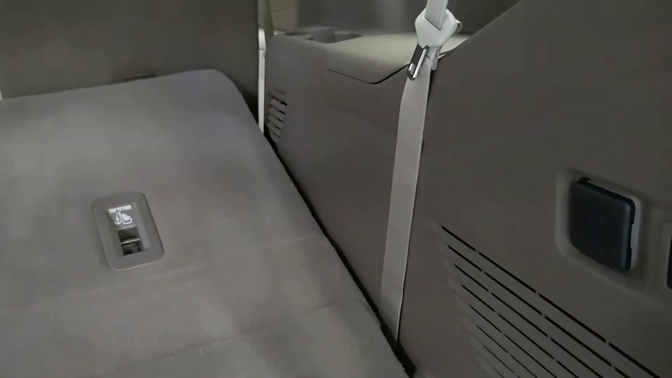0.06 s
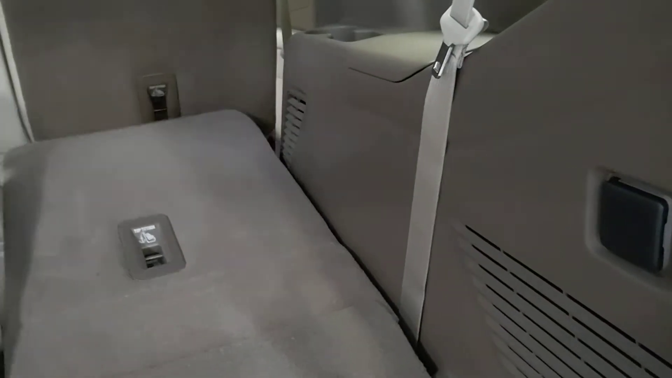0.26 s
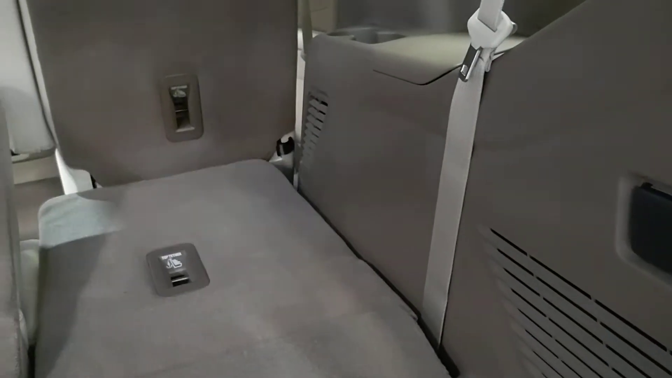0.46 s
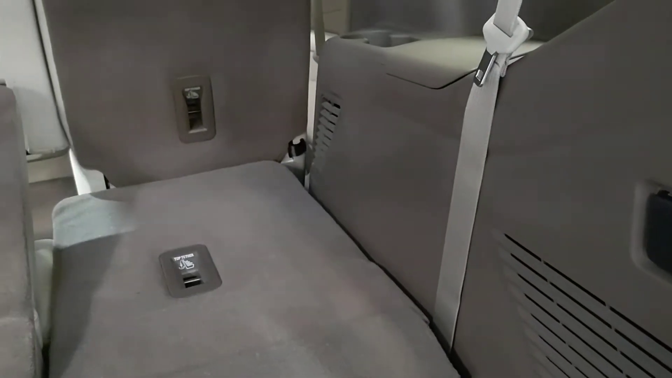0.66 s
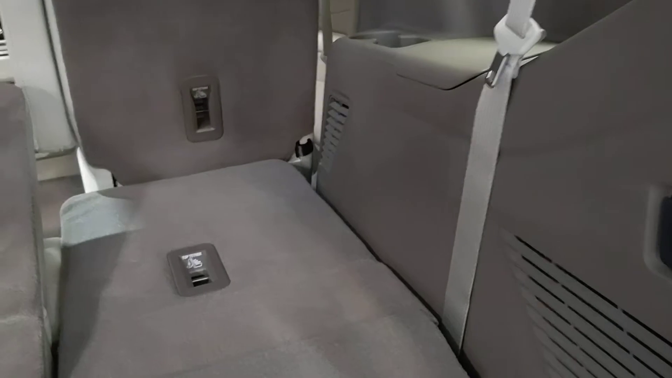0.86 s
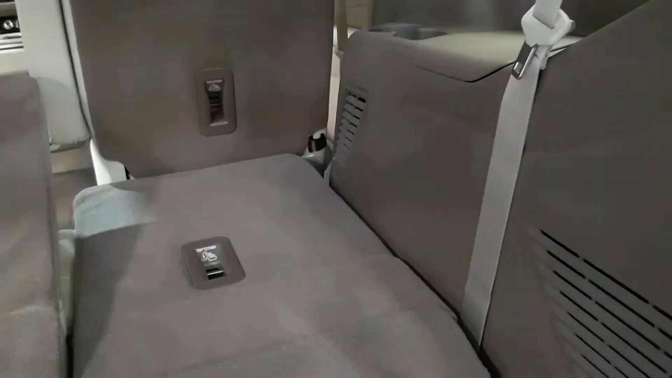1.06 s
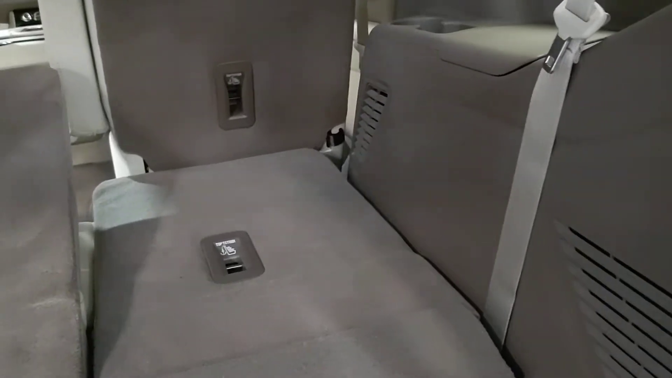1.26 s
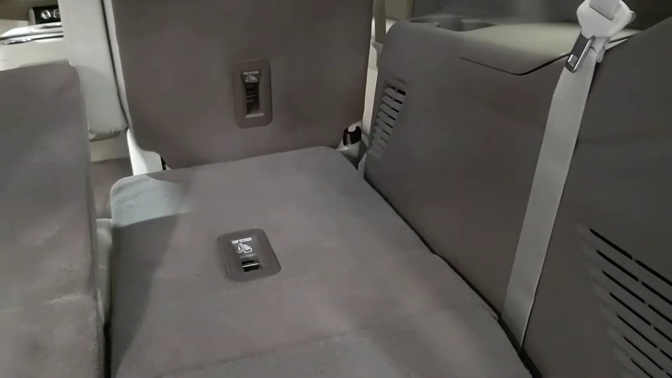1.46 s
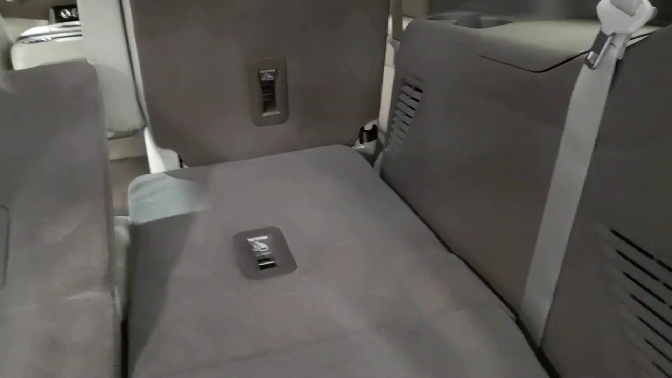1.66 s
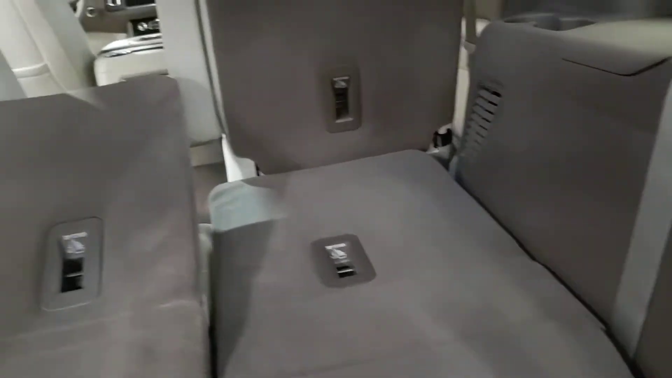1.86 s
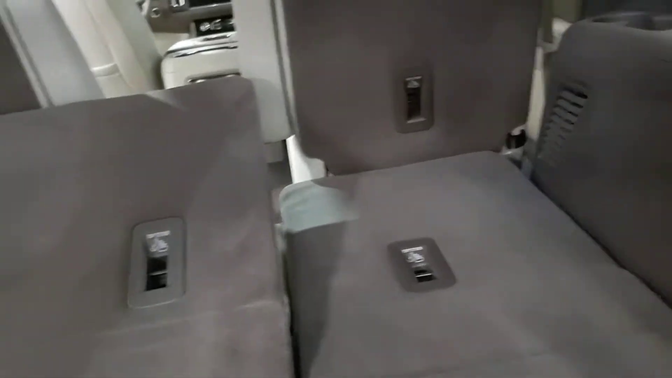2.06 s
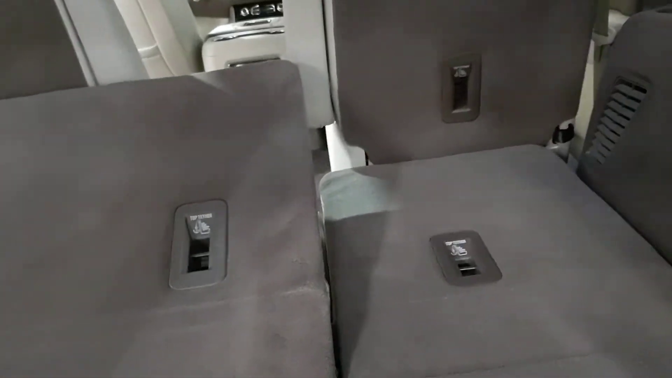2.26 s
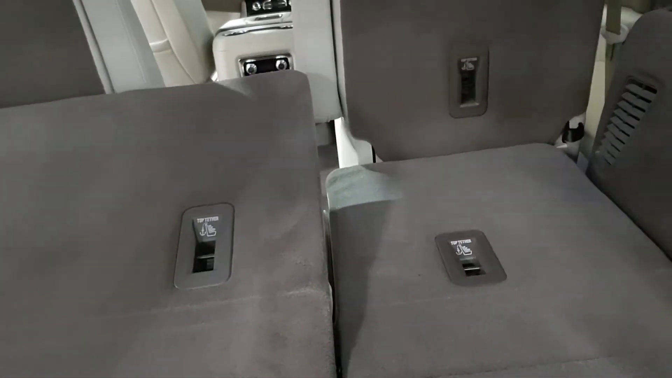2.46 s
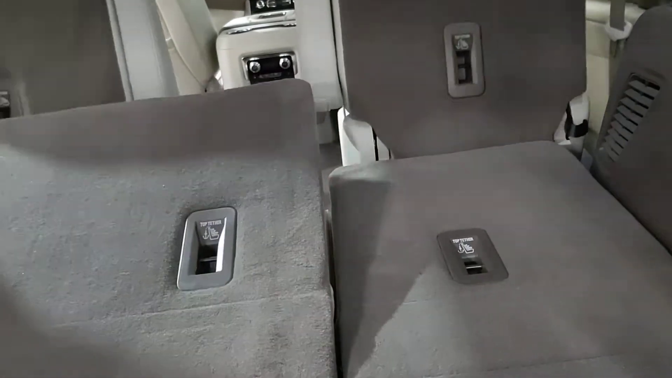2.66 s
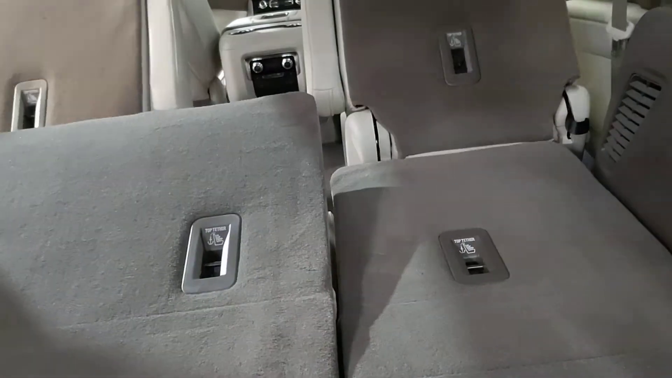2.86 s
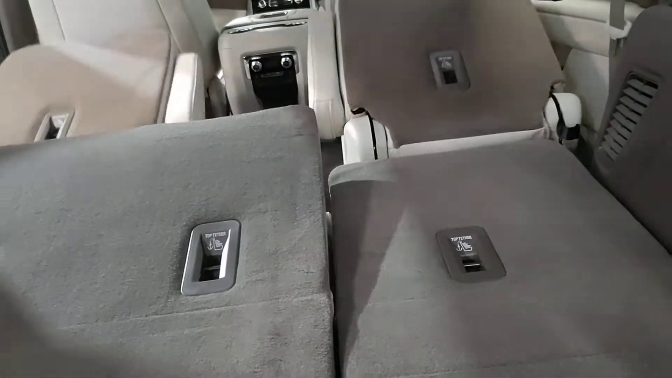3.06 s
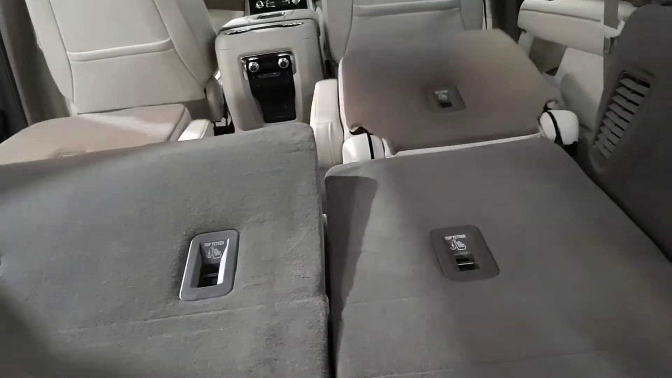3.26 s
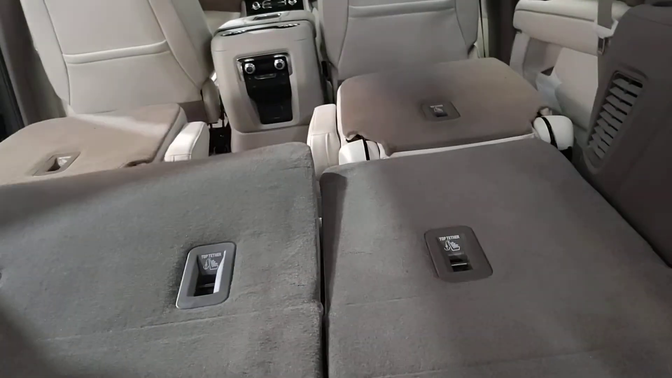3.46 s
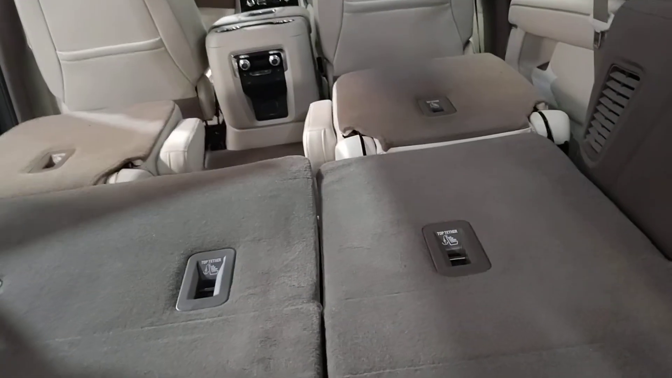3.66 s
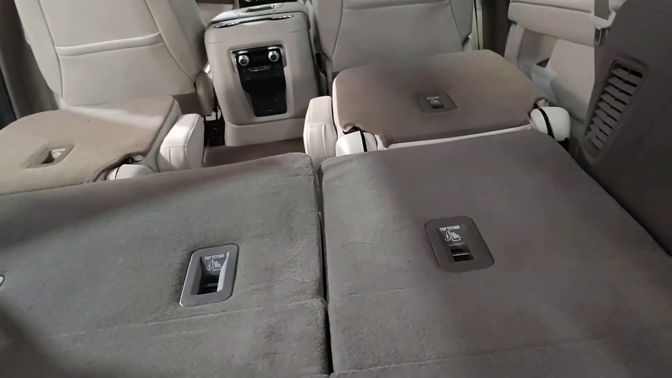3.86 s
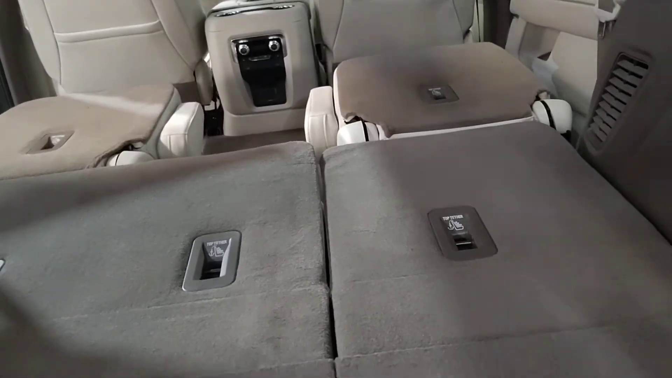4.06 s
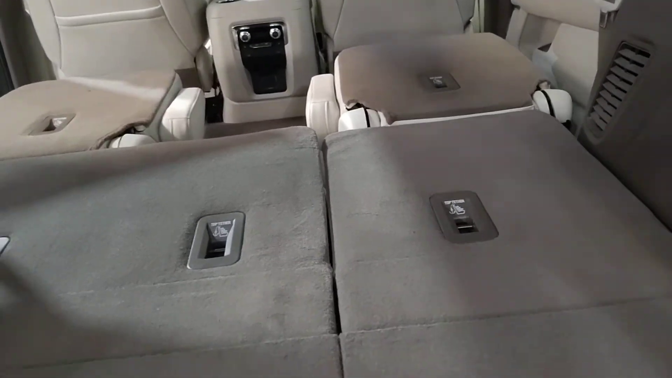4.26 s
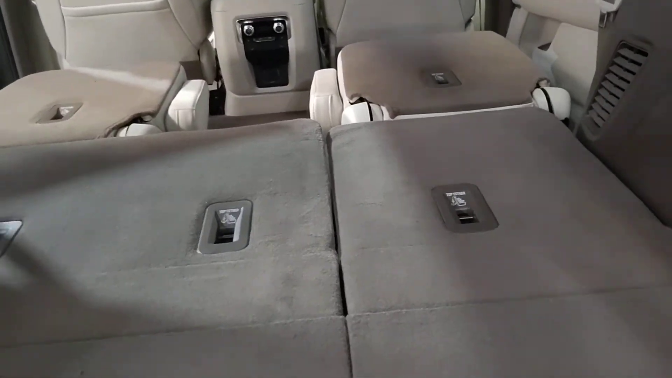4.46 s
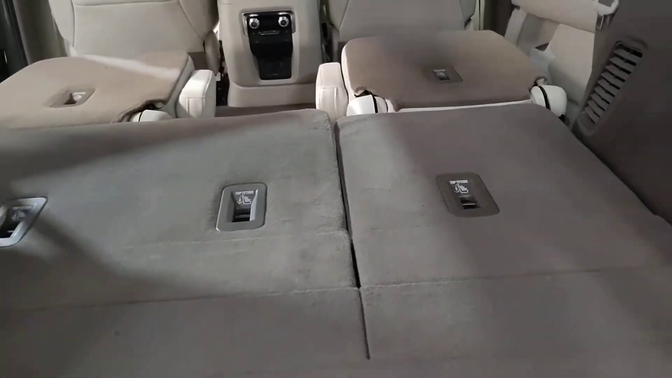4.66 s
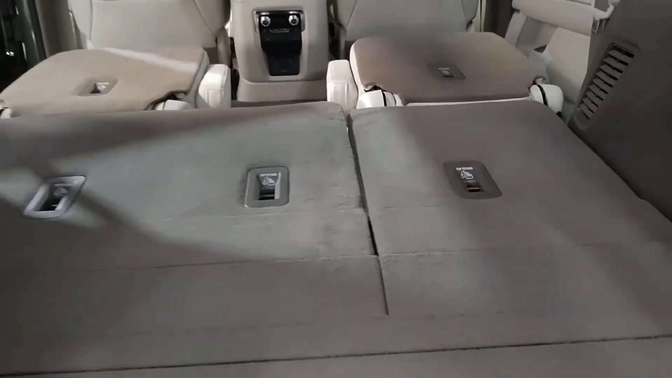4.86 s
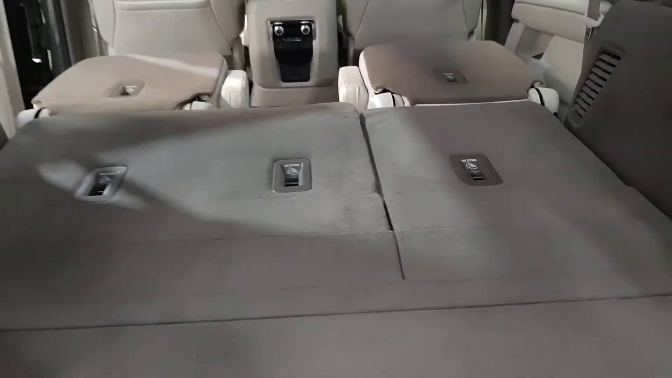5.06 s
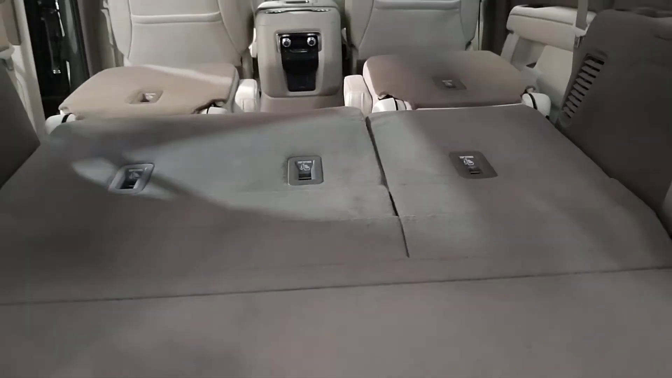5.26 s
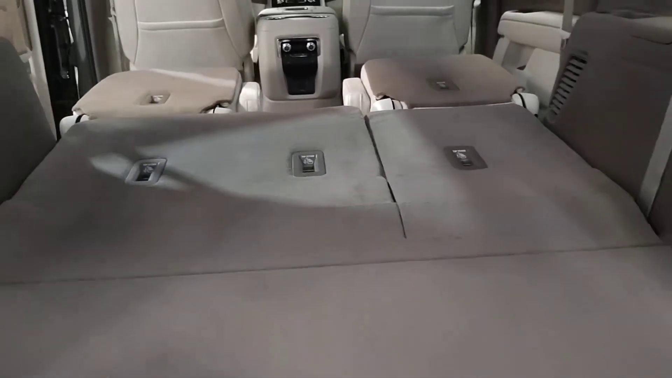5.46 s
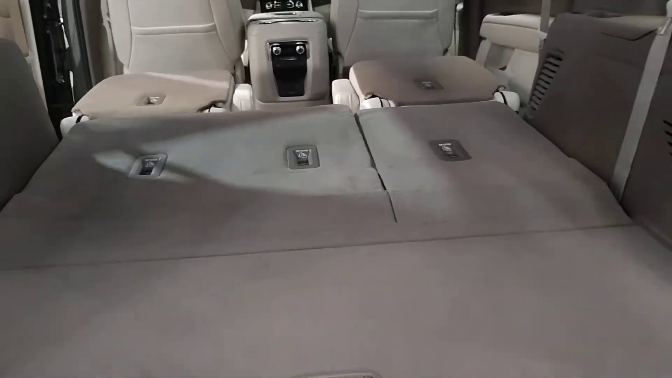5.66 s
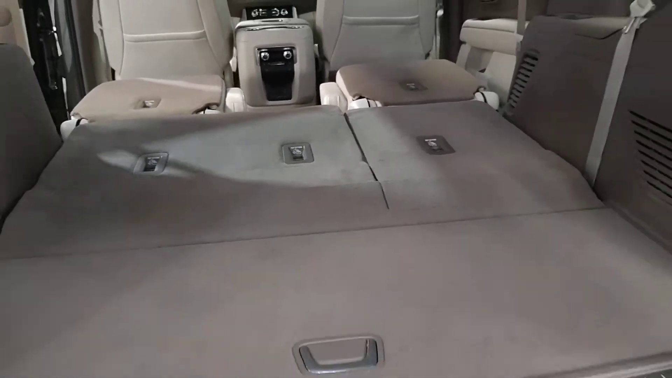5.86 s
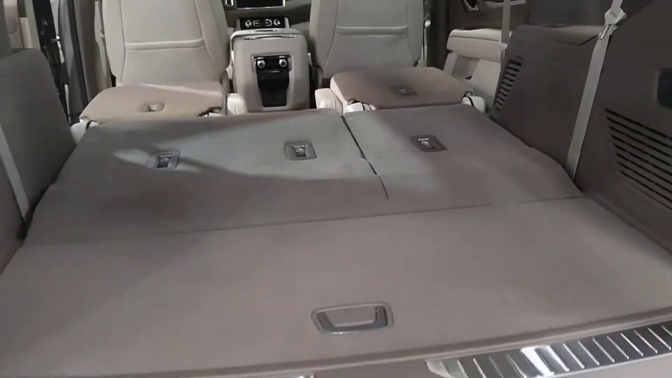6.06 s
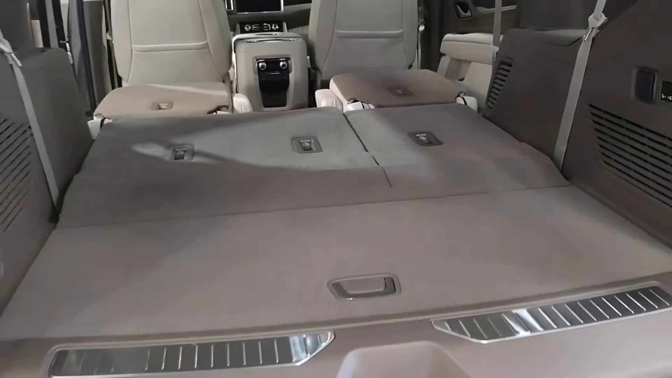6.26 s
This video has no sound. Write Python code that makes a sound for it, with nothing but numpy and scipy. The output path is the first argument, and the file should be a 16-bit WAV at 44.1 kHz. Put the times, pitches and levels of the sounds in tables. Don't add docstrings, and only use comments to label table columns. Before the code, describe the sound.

Quiet car interior with faint finger ticks and cloth rustle, then latches clack and padded seat backs slam down in booming thuds; afterwards a car hisses past.

```python
import sys
import numpy as np
from scipy import signal
from scipy.fft import rfft, irfft
from scipy.io import wavfile
from scipy.ndimage import uniform_filter1d

SR = 44100
rng = np.random.default_rng(int(sys.argv[2]) if len(sys.argv) > 2 else 0)


def undo_db(level):
    steps = np.asarray(level, float) / 20
    return 10 ** steps


def int16_out(signal):
    q = np.round(np.clip(np.atleast_2d(signal).T, -1, 1) * 32767)
    wavfile.write(sys.argv[1], SR, q.astype(np.int16))


N = 278712
TIME = np.arange(N) / SR

# (frequency [Hz], width [Hz], level [dB])
LATCH_MODES = [(1100, 210, 20.5), (1590, 720, 20.5), (2250, 400, 9), (2750, 210, 7), (3550, 230, 0),
               (4600, 860, -40)]


def unit(x):
    return x / np.sqrt(np.mean(x ** 2))


def colour(x, shape):
    hz, db = np.transpose(shape)
    bins = np.log(np.arange(N // 2 + 1) * SR / N + 1)
    return irfft(rfft(x) * undo_db(np.interp(bins, np.log(hz), db)), N)


def closed(shape):
    below = (shape[0][0] / 1.3, -80)
    above = (shape[-1][0] * 1.2, -80)
    return [below] + list(shape) + [above]


def ring(x, modes):
    return sum(undo_db(db) * signal.lfilter(*signal.iirpeak(hz, hz / width, SR), x) for hz, width, db in modes)


def ports(share, lag=17):
    share = np.clip(share, 0, 1)
    common, left, right = rng.standard_normal((3, N))
    together = np.array([np.roll(common, lag), common])
    apart = np.array([left, right])
    return np.sqrt(share) * together + np.sqrt(1 - share) * apart


def walk(rate):
    k = int(SR / rate)
    held = np.repeat(rng.standard_normal(N // k + 1), k)
    slewed = uniform_filter1d(uniform_filter1d(held, k), k)
    return unit(slewed[:N])


def booms(table, rise_ms, modes, sag=0.):
    out = np.zeros(N)
    t = TIME[:SR // 2]
    for s, db, hz, t60 in table:
        turn = 2 * np.pi * np.cumsum(hz * (1 + sag * np.exp(-t / 0.0053))) / SR
        tone = np.sin(turn) * 1000. ** (-t / max(t60, .01))
        draws = rng.standard_normal((len(modes), 2))
        for (mode_hz, mode_db, share), (size, start) in zip(modes, draws):
            decay = 1000. ** (-t / max(share * t60, .01))
            tone += undo_db(mode_db + 2.45 * size) * np.sin(2 * np.pi * mode_hz * t + start) * decay
        rise = (1 - np.exp(-t * 1000 / rise_ms)) ** 2
        at = int(s * SR)
        out[at:at + len(t)] += (undo_db(db + 3.0) * rise * tone)[:N - at]
    return out


def swells(table, likeness):
    out = np.zeros((2, N))
    ms = TIME[:SR // 4] * 1000
    share = np.clip(likeness, 0, 1)
    noises = rng.standard_normal((len(table), 3, len(ms)))
    for (s, db, hz, width_hz, length_ms), noise in zip(table, noises):
        rise = np.clip(ms / (0.28 * length_ms), 0, 1)
        fade = np.exp(-np.clip(ms - length_ms, 0, None) / (0.6 * length_ms))
        both = np.sqrt(share) * noise[0] + np.sqrt(1 - share) * noise[1:]
        band = ring(both, [(hz, width_hz, 0)])
        band = unit(ring(band, [(hz, 1.22 * width_hz, 0)]))
        at = int(s * SR)
        out[:, at:at + len(ms)] += (undo_db(db) * rise * fade * band)[:, :N - at]
    return out


def cabin(x, t60, top_hz, wet_db):
    t = np.arange(SR // 2) / SR
    tail = rng.standard_normal((2, len(t))) * 1000. ** (-t / t60) * (t > .004)
    tail = signal.lfilter(*signal.butter(1, top_hz, fs=SR), tail)
    tail /= np.sqrt(np.sum(tail ** 2, axis=1, keepdims=True))
    return x + undo_db(wet_db) * signal.fftconvolve(x, tail, axes=1)[:, :N]


def bed():
    # (time [s], level above rest [dB])
    shake_curve = [
        (2.7, -5),
        (2.8, 9),
        (2.92, 16.5),
        (3.06, 14.5),
        (3.17, 32.5),
        (3.31, 38),
        (3.47, 25.5),
        (3.66, 6.5),
        (4.1, -5.5),
    ]
    # (time [s], lean [0-1])
    hatch_curve = [
        (0.0, 0.67),
        (0.46, 0.14),
        (1.3, 0.07),
        (1.9, 0.21),
        (2.25, 0.16),
        (2.8, 0.2),
        (4.3, 0.13),
        (5.0, 0.28),
        (5.65, 0.74),
        (6.32, 0.95),
    ]
    rest_levels = [-58.5, -66, -66, -74.5]
    shake_shares = [0.91, 0.64, 0.39, 0.23]
    outside_gains = [5.8, 2, 10.1, 5]
    # (frequency [Hz], level [dB per Hz])
    rumble_shape = [(28, -40), (42, -14), (52, -28), (63, -0.5), (85, -8.5), (113, 0.5), (145, -10.5),
                    (260, -16.5)]
    frame_shape = [(190, -9.5), (260, -2.5), (450, -1.5), (575, -5), (790, -3.5), (1150, -7.5),
                   (1400, -9.5)]
    street_shape = [(900, -6), (1300, -5), (1700, -3.5), (2380, -5), (3200, -7.5), (4700, -14),
                    (6500, -37.5)]
    cloth_shape = [(3500, -4.5), (5500, -3.5), (8000, -8.5), (11300, -13), (14000, -20.5), (16000, -15)]

    shake = np.interp(TIME, *np.transpose(shake_curve))
    hatch = np.interp(TIME, *np.transpose(hatch_curve))
    rumble_db, frame_db, street_db, cloth_db = (
        rest + share * shake + gain * hatch
        for rest, share, gain in zip(rest_levels, shake_shares, outside_gains))
    rumble = unit(colour(ports(1.0), closed(rumble_shape))) * undo_db(rumble_db + 0.2 * walk(4.7))
    frame = unit(colour(ports(0.71), closed(frame_shape))) * undo_db(frame_db + 6.0 + 0.2 * walk(23.84))
    street = unit(colour(ports(0.25), closed(street_shape))) * undo_db(street_db + 3 + 0.6 * walk(15))
    cloth = unit(colour(ports(0.0087), closed(cloth_shape))) * undo_db(cloth_db + 5.0 + 0.18 * walk(24.63))
    return rumble + frame + street + cloth


def rustles():
    # (start [s], stop [s], level [dB])
    drags = [(0, 0.102, -62), (0.328, 0.397, -61.5), (0.394, 0.542, -57), (.71, 0.727, -69),
             (1.494, 1.516, -63), (2.006, 2.023, -71), (2.056, 2.065, -60), (3.5, 3.77, -66),
             (4.082, 4.1, -55), (4.17, 4.222, -70), (4.242, 4.276, -72), (5.59, 5.627, -66)]
    # (frequency [Hz], level [dB per Hz])
    rub_shape = [(3000, -14), (5000, -8), (8000, -9), (11000, -10.5), (13500, -13), (16000, -14)]
    drag = np.zeros(N)
    for start, stop, db in drags:
        corners = [start, 0.41 * start + .6 * stop, stop, stop + .008]
        drag += undo_db(db) * np.interp(TIME, corners, [0.0034, 0.96, 0.48, 0.0046])
    return drag * undo_db(0.55 * walk(290)) * unit(colour(ports(.05), closed(rub_shape)))


def ticks():
    # (time [s], peak [dB], body re crack [dB], t60 [s], left minus right before scaling by 0.44 [dB])
    snaps = [(0.0591, -45, 1, 0.041, 7), (0.912, -33.5, -6, 0.0065, -20), (0.9722, -41, 0, 0.013, -16),
             (0.9765, -41, 0, 0.014, -16), (1.618, -46.5, -2, 0.023, -21), (1.6345, -49, -8, 0.01, -10),
             (1.6382, -42, -4, 0.014, -8), (1.6583, -53, 7, 0.02, -9), (1.7195, -29.5, -10, 0.01, -13),
             (2.1645, -57, 6, 0.015, 4), (2.2236, -45, -14, 0.01, -13), (4.069, -42.5, -2, 0.013, -16),
             (4.0804, -48, -24, 0.013, -15), (4.0874, -49.5, 0, 0.038, -18),
             (4.0979, -47.5, -14, 0.044, -15), (4.1857, -51, 1, 0.083, 4), (4.7327, -48.5, -1.5, 0.032, 1),
             (5.238, -59.5, 12, 0.032, 11.5), (5.608, -52, 2, 0.023, -4.5), (5.653, -53, 0, 0.07, 0),
             (6.045, -45.5, 7, 0.024, -6)]
    # (time [s], peak [dB])
    crackles = [(0.3506, -54), (0.7188, -57), (1.3992, -56), (1.4995, -60), (1.6264, -58), (1.7504, -62),
                (1.7779, -52), (1.7943, -52), (1.8114, -53), (1.8284, -55), (1.8522, -50), (1.8841, -52),
                (1.9224, -62.5), (1.9545, -57.5), (1.9834, -55), (2.0143, -58), (2.0183, -59),
                (2.0617, -58), (4.2631, -59)]
    # (frequency [Hz], level [dB per Hz])
    snap_shape = [(5200, -11), (6300, 0), (8000, -1.5), (10500, -2), (13000, -8), (15000, -6), (16500, -30)]
    # (frequency [Hz], width [Hz], level [dB])
    case_modes = [(15200, 630, -4), (12800, 700, -8)]

    out = np.zeros((2, N))
    bright = unit(colour(ports(0.048), closed(snap_shape)))
    dull = unit(ring(ports(0.24), LATCH_MODES))
    t = TIME[:SR // 10]
    alike = [(s, db + 2.5, -11, 0.016, -3) for s, db in crackles]
    for s, db, body_db, t60, pan_db in list(snaps) + alike:
        hz = 6900 + 326 * max(-48.5 - db, 0)
        span = slice(int(s * SR), int(s * SR) + len(t))
        envelope = np.clip(t / 0.0015, 0, 1) * 1000. ** (-t / max(t60, .003))
        level = undo_db(db + 0.22 * np.array([[pan_db], [-pan_db]]))
        pitched = ring(bright[:, span], [(hz, 0.065 * hz, 0)] + list(case_modes))
        crack = undo_db(-6.0) * bright[:, span] + undo_db(-4.0) * pitched
        out[:, span] += envelope * level * (crack + undo_db(body_db - 5.0) * dull[:, span])
    return out


def brushes():
    # (time [s], peak [dB], frequency [Hz], width [Hz], length [ms])
    strokes = [
        (0.26, -72.5, 10000, 4000, 60),
        (0.44, -64.5, 11500, 3500, 69),
        (0.917, -69, 10800, 3000, 24),
        (0.977, -56, 10700, 900, 3),
        (1.626, -60, 12500, 1200, 3),
        (5.95, -78, 10500, 3500, 50),
        (6.06, -75, 9500, 4000, 43),
        (5.57, -72, 10000, 2500, 50),
        (5.7, -75, 10300, 3000, 130),
        (2.728, -54, 6000, 1500, 22),
    ]
    return swells(strokes, 0.1)


def taps():
    # (time [s], peak [dB], frequency [Hz], t60 [s])
    trim_taps = [(0.301, -47.5, 280, 0.038), (0.512, -45, 310, 0.041), (0.543, -43, 304, 0.04),
                 (0.6, -53, 306, 0.045), (0.72, -52.5, 300, 0.072), (0.884, -47.5, 412, 0.05),
                 (1.539, -52, 413, 0.065), (1.621, -47, 280, 0.027), (1.799, -55, 486, 0.049),
                 (2.389, -19, 306, 0.025), (2.445, -16.5, 472, 0.014), (2.73, -29.5, 390, 0.05),
                 (3.127, -17, 149, 0.027), (3.135, -28, 231, 0.027), (3.189, -17, 241, 0.019),
                 (3.244, -46, 250, 0.043), (3.3, -41, 263, 0.033), (3.384, -24, 326, 0.058),
                 (3.442, -21.5, 335, 0.052), (4.108, -44.5, 339, 0.024), (5.788, -37.5, 424, 0.015)]
    return booms(trim_taps, 1.0, [])


def clacks():
    # (time [s], metal peak [dB], panel knock re metal [dB], rattle re metal [dB], hold
    # [ms])
    releases = [(0.532, -46.5, 6.5, -25, 2.3), (2.39, -28.5, 5.5, -3.5, 20), (2.434, -33, 8.5, 2, 12),
                (2.444, -20, -3, -10, 10.7), (2.453, -29.5, -6, 3.5, 3.4), (2.516, -39, -3, -9, 11),
                (2.727, -29, 2, -51, 23), (2.757, -40, 5, -26, 13), (2.820, -52, 6, 1, 28),
                (2.847, -43.5, 10.5, -26, 11), (2.926, -20, -3, -9, 4), (2.938, -19, -3.5, -11, 2.9),
                (2.982, -44, 4, -30, 9.7)]
    landings = [(3.098, -30, -3.5, -17, 8.6), (3.132, -26.5, 7, 4, 16), (3.153, -47.5, 21, 7, 11.6),
                (3.185, -30.5, 6.5, 10, 17.2), (3.201, -40, 0, 12, 15), (3.226, -39, 7, 3, 14),
                (3.25, -56, 13, -9, 6), (3.279, -31.5, 7.5, -16, 7.4), (3.299, -41, -1, 0, 4.5),
                (3.312, -33, -10, 0, 11), (3.322, -32, -9.5, 9.5, 9.6), (3.347, -28, 6, -2.5, 26),
                (3.381, -19.5, -5, 1, 9), (3.417, -20.5, -5, 4, 11.5), (3.441, -18, -7, -5, 5)]
    # (frequency [Hz], width [Hz], level [dB])
    panel_modes = [(280, 24, -5), (374, 76, 14.5), (445, 41, 3), (560, 95, 5), (720, 24, -14),
                   (990, 55, -9)]
    # (frequency [Hz], level [dB per Hz])
    rattle_shape = [(4000, -6), (5500, -2), (7500, -1.5), (10000, -3.5), (12500, -5), (15000, -8),
                    (16500, -33)]

    knock, metal, rattle = np.zeros((3, N))
    for s, db, knock_db, rattle_db, hold_ms in list(releases) + list(landings):
        ms = (TIME - s) * 1000
        burst = np.clip(ms / 2.45, 0, 1) * np.exp(-np.clip(ms - hold_ms, 0, None) / 10)
        knock += undo_db(db + knock_db) * burst
        metal += undo_db(db) * burst
        rattle_rise = np.clip((ms + 2.1) / 6.7, 0, 1)
        rattle_fade = np.exp(-np.clip(ms - 0.95 * hold_ms, 0, None) / 10.3)
        rattle += undo_db(db + rattle_db) * rattle_rise * rattle_fade
    grit = undo_db(2.5 * walk(300))
    white = ports(0.68, lag=0)
    panel = ring(white * knock, panel_modes) / ring(white, panel_modes).std()
    panel = signal.lfilter(*signal.butter(2, 270, "high", fs=SR), panel)
    white = ports(0.065) * grit
    latch = ring(white * metal, LATCH_MODES) / ring(white, LATCH_MODES).std()
    latch = signal.lfilter(*signal.butter(4, 6000, fs=SR), latch)
    loose = unit(colour(ports(0.029) * grit, closed(rattle_shape))) * rattle
    return undo_db(-10.0) * panel + undo_db(-11.0) * latch + undo_db(-13.0) * loose


def scuffs():
    # (time [s], peak [dB], frequency [Hz], width [Hz], length [ms])
    scrapes = [(0.533, -55, 1200, 1200, 7.2), (0.972, -59, 5800, 1500, 6), (1.7202, -43, 6200, 900, 2.2),
               (2.392, -40.5, 3060, 900, 7.5), (2.444, -34, 1100, 900, 11),
               (2.446, -33.5, 2760, 1200, 10.4), (2.458, -48, 3960, 700, 16), (2.515, -58, 2110, 1500, 67),
               (2.73, -45, 404, 150, 20), (2.938, -38, 5500, 690, 4.3), (3.1, -44.5, 2300, 1400, 9.4),
               (3.134, -34.5, 3650, 1200, 14.6), (3.15, -38, 500, 350, 23), (3.191, -34, 3700, 1400, 18),
               (3.2, -41, 510, 350, 33), (3.279, -46, 1990, 1790, 7.4), (3.293, -40, 900, 700, 13),
               (3.32, -43, 2630, 400, 11), (3.323, -49, 3980, 500, 13), (3.349, -42, 3660, 1000, 19),
               (3.358, -38, 2210, 500, 12), (3.381, -31.5, 9000, 3500, 13.7), (3.39, -42, 2550, 400, 19),
               (3.417, -33.5, 4600, 900, 11), (3.423, -36, 2720, 700, 17), (3.44, -40, 2450, 500, 8.4),
               (3.44, -33, 11300, 2500, 8), (3.446, -42, 5370, 700, 9), (3.49, -56.5, 2120, 2000, 91),
               (3.58, -58, 2540, 2480, 75)]
    return swells(scrapes, 0.17)


def hollows():
    # (time [s], peak [dB], frequency [Hz], width [Hz], length [ms])
    body_swells = [(0.535, -58, 330, 300, 55), (1.6, -62.5, 557, 350, 58), (2.389, -35, 560, 500, 14),
                   (2.44, -34.5, 520, 500, 24.6), (2.728, -39, 398, 200, 28), (2.925, -39, 200, 90, 58),
                   (3.03, -46, 200, 90, 60), (3.13, -33, 350, 250, 26), (3.186, -28, 330, 249, 21.6),
                   (3.24, -36, 500, 250, 14), (3.35, -35, 600, 500, 34), (5.45, -69, 6000, 2500, 400),
                   (5.9, -67, 4170, 2500, 400), (3.16, -39, 600, 350, 18), (3.215, -41, 600, 400, 32),
                   (3.46, -51, 895, 900, 110), (0.533, -53, 700, 900, 8)]
    return swells(body_swells, 0.63)


def knocks():
    # (time [s], peak [dB], frequency [Hz], t60 [s])
    plate_knocks = [(0.534, -49, 540, 0.02), (2.391, -21.5, 476, 0.021), (2.395, -27, 760, 0.051),
                    (2.4345, -25, 480, 0.022), (2.4452, -18, 540, 0.02), (2.455, -27, 267, 0.051),
                    (2.461, -34, 644, 0.028), (2.732, -41, 747, 0.048), (2.739, -33, 450, 0.054),
                    (2.7345, -38, 1070, 0.02), (3.14, -35, 470, 0.036), (3.194, -21.5, 448, 0.052),
                    (3.234, -33, 490, 0.082), (3.354, -21.5, 581, 0.04), (0.9732, -46.5, 2350, 0.013),
                    (1.6192, -52, 1920, 0.027), (2.4468, -28, 2400, 0.012), (3.4244, -34, 2617, 0.11),
                    (3.4205, -33, 4900, 0.02), (3.4435, -26, 850, 0.012), (3.3575, -31, 1530, 0.011),
                    (3.3635, -22, 346, 0.02), (3.1945, -16, 330, 0.015), (3.145, -25, 240, 0.02),
                    (4.0696, -56.5, 1810, 0.033), (2.9851, -43, 2900, 0.027), (3.2804, -36, 1720, 0.025)]
    return booms(plate_knocks, 0.43, [])


def thumps():
    # (time [s], peak [dB], boom [Hz])
    seat_blows = [(2.388, -22.5, 93), (2.441, -18, 122.5), (2.484, -29.5, 83), (2.508, -26, 121),
                  (2.532, -30, 100), (2.573, -39.5, 124), (2.76, -35, 97.5), (2.806, -27.5, 124.5),
                  (2.828, -35.5, 73.6), (2.894, -27, 121.6), (2.935, -23, 90), (2.952, -35, 108),
                  (2.982, -38, 89.5), (3.013, -35, 118.6), (3.098, -21, 101.4), (3.1265, -3, 128),
                  (3.164, -9, 172), (3.182, 0, 116.7), (3.219, -8, 166), (3.245, -9, 100.8),
                  (3.274, -20.5, 75.5), (3.295, -14, 114.4), (3.323, -16, 173), (3.355, -16, 94),
                  (3.394, -34, 96), (3.444, -15, 88.3), (3.489, -29, 71), (3.529, -37, 69.4),
                  (3.575, -37.5, 96), (3.625, -31, 117)]
    # (time [s], peak [dB], boom [Hz])
    bumps = [
        (0.535, -40, 159),
        (0.557, -41.5, 87),
        (0.583, -49, 95),
        (0.619, -48, 86.5),
        (0.999, -48, 107),
        (1.638, -45, 159),
        (1.665, -41.5, 110),
        (4.068, -45, 117),
    ]
    # (frequency [Hz], level [dB], share of the boom t60 [0-1])
    seat_modes = [(173, -0.5, 0.47), (209.5, -14.5, 0.88), (288, -23, 0.93), (333.7, -14, 0.91),
                  (409, -4, 0.25), (525, -29, 0.78), (614, -19.5, 0.34), (690, -16, 0.18)]
    cycles = 10.7
    blows = [(s, db, hz, cycles / hz) for s, db, hz in sorted(list(seat_blows) + list(bumps))]
    return booms(blows, 6.03, seat_modes, sag=0.32)


def whips():
    # (time [s], peak [dB], frequency [Hz], width [Hz], length [ms])
    lashes = [(1.74, -72.5, 6900, 1500, 140), (2.03, -67, 1500, 900, 210), (2.454, -41.5, 7200, 900, 8),
              (2.728, -50, 4480, 600, 14), (2.76, -51, 2800, 900, 9.2), (3.129, -49, 12000, 2500, 12),
              (3.184, -50, 12400, 3000, 12), (3.275, -58, 10740, 500, 6), (3.344, -44, 11500, 2500, 14),
              (3.377, -43, 12500, 3000, 9.2), (3.7, -63.5, 3220, 1500, 100), (5.8, -78, 10500, 3000, 99),
              (6.07, -79, 10600, 3000, 40)]
    return swells(lashes, 0.19)


def squeaks():
    # (time [s], peak [dB], frequency [Hz], t60 [s])
    chirps = [
        (2.07, -62, 1300, .08),
        (2.1, -59, 1310, 0.07),
        (2.11, -62, 820, .1),
        (2.225, -65, 1546, .1),
        (2.26, -62, 864, 0.087),
        (2.578, -42, 1525, 0.047),
        (2.826, -51, 4600, .05),
        (5.23, -60, 3300, .05),
    ]
    return booms(chirps, 2.1, [])


def undertones():
    # (time [s], peak [dB], frequency [Hz], t60 [s])
    low_tones = [(2.732, -38.5, 119, 0.13), (2.775, -37, 100, 0.1), (2.9545, -26, 100, 0.06),
                 (2.984, -26, 95, 0.09), (3.008, -29, 119, 0.16), (3.0332, -29, 119, 0.08),
                 (3.103, -27, 111, 0.064), (3.392, -20, 99, 0.084), (3.572, -30.5, 93, 0.11),
                 (3.66, -41, 79.6, 0.09), (3.79, -47, 116, 0.17)]
    return booms(low_tones, 4.7, [])


def sweep(hz, width_hz):
    turn = 2 * np.pi * np.cumsum(hz) / SR
    soft = signal.butter(2, width_hz, fs=SR)
    cosine_part = np.cos(turn) * signal.lfilter(*soft, ports(0.17))
    sine_part = np.sin(turn) * signal.lfilter(*soft, ports(0.08))
    return unit(cosine_part + sine_part)


def passing():
    # (time [s], tyre hiss [dB], hiss centre [Hz], spread [0-1])
    course = [
        (5.38, -96, 3000, 0.08),
        (5.43, -61, 2965, 0),
        (5.551, -65.5, 2880, .1),
        (5.65, -55, 2773, 0.4),
        (5.8, -53.5, 2526, 1.2),
        (5.95, -49.5, 2423, 1.14),
        (6.07, -55.5, 2464, 1.1),
        (6.16, -53, 2254, 0.8),
        (6.32, -54, 2400, 0.7),
    ]
    s, *columns = np.transpose(course)
    db, hz, spread = (np.interp(TIME, s, column) for column in columns)
    spread = np.clip(spread, 0, 1)
    narrow = sweep(hz, 170) + undo_db(-8.0) * sweep(.54 * hz, 170)
    roar = unit(ring(ports(0.92), [(780, 290, 10.0), (1600, 370, -21)]))
    wide = sweep(hz, 500) + undo_db(-4.0) * roar
    return undo_db(db + .8 * walk(14)) * ((1 - spread) * narrow + spread * wide)


def glances():
    # (time [s], peak [dB], frequency [Hz], width [Hz], length [ms])
    reflections = [
        (5.44, -66, 1560, 200, 83),
        (5.53, -61.5, 2250, 300, 78),
        (5.61, -68, 1450, 250, 60),
        (5.6, -71, 2750, 300, 90),
        (5.91, -58, 2490, 600, 80),
        (6.11, -55, 2350, 591, 81),
        (6.22, -58, 2150, 400, 70),
    ]
    return swells(reflections, 0.2)


def scene():
    soft_blows = thumps() + undertones()
    padded = cabin(np.tile(soft_blows, (2, 1)), t60=0.21, top_hz=396, wet_db=-33.5)
    hard_tones = taps() + knocks() + squeaks()
    hard = cabin(clacks() + hard_tones, t60=0.16, top_hz=3000, wet_db=-17)
    echoed = cabin(hard, t60=0.88, top_hz=3980, wet_db=-20.5)
    near = cabin(ticks(), t60=0.12, top_hz=9000, wet_db=-12.5) + rustles() + brushes()
    landing_noise = scuffs() + hollows() + whips()
    outside = passing() + glances()
    return bed() + near + padded + echoed + landing_noise + outside


def roll_off(x):
    return signal.sosfilt(signal.butter(12, 15940, fs=SR, output="sos"), x)


def record(dry):
    # (frequency [Hz], left minus right [dB])
    left_port = [(200, 0), (500, 1.5), (1300, 0), (4400, 1), (8000, -5), (12000, -19), (16000, -6)]
    # (frequency [Hz], level [dB])
    phone_shape = [(20, -6), (35, 3.5), (55, 2.5), (15850, -3), (16050, -49)]
    left_tilt = [(hz, db / 2) for hz, db in left_port]
    right_tilt = [(hz, -db / 2) for hz, db in left_port]
    heard = np.array([colour(dry[0], left_tilt), colour(dry[1], right_tilt)])
    mix = colour(heard, phone_shape)
    return roll_off(mix)


dry = scene()
out = record(dry)
int16_out(out)
```